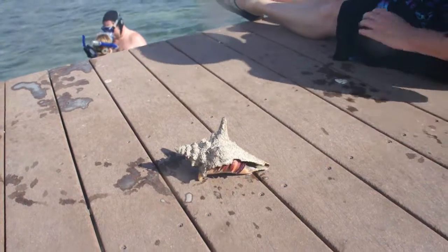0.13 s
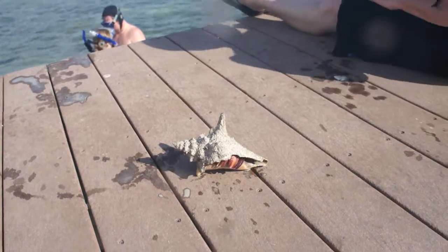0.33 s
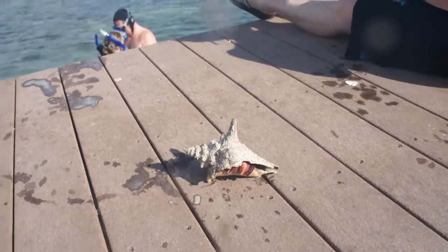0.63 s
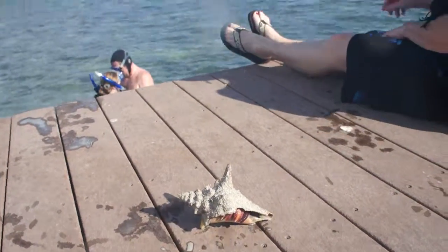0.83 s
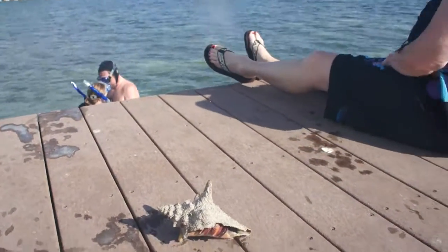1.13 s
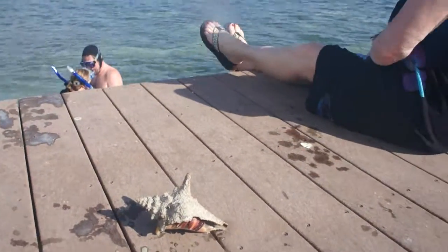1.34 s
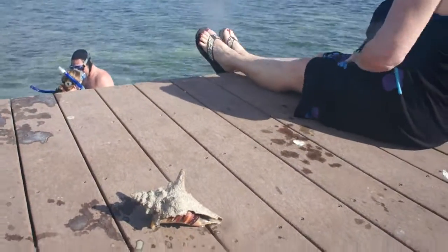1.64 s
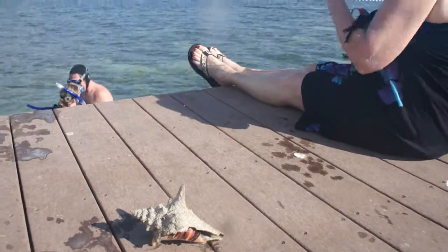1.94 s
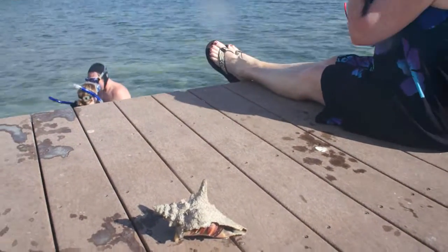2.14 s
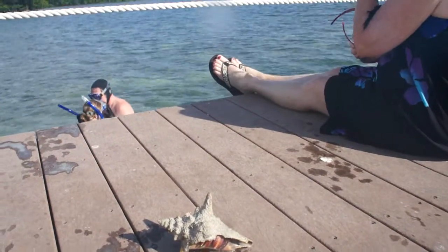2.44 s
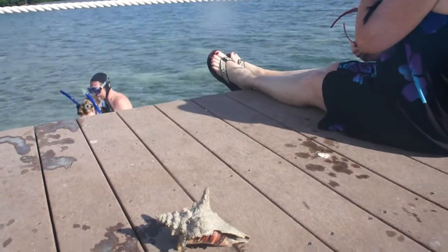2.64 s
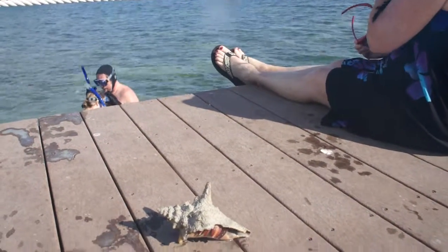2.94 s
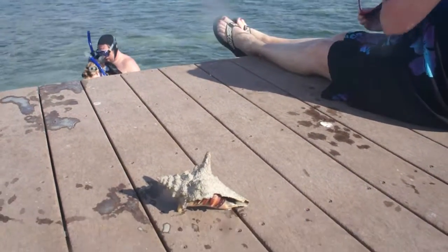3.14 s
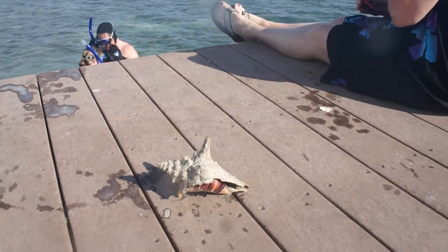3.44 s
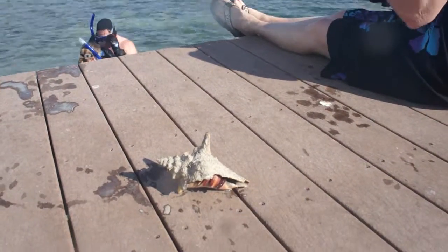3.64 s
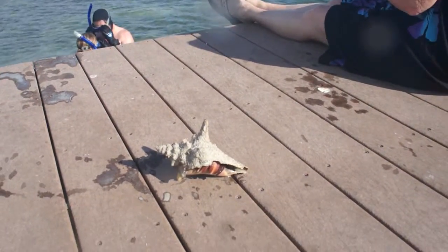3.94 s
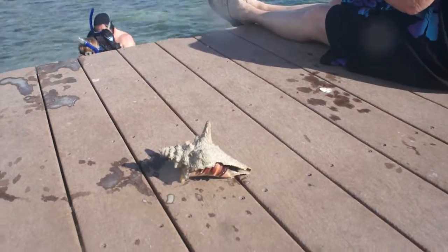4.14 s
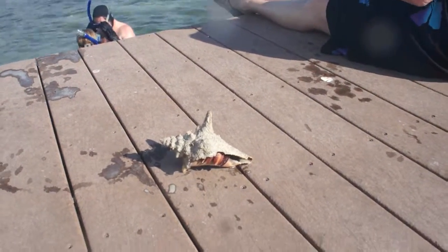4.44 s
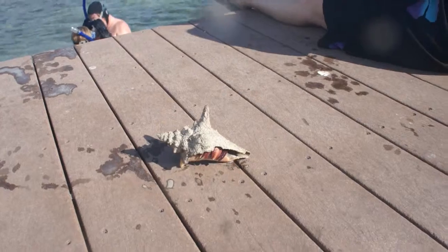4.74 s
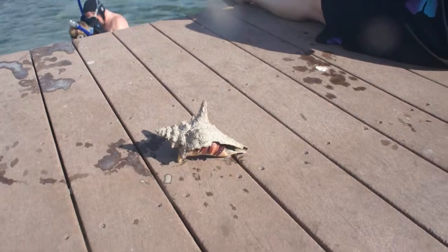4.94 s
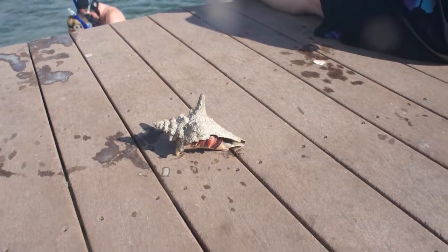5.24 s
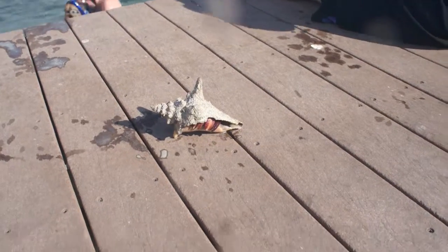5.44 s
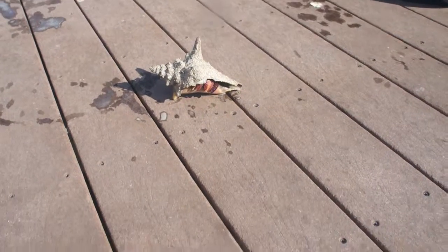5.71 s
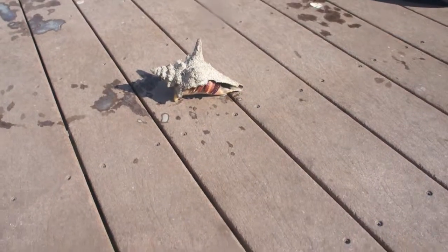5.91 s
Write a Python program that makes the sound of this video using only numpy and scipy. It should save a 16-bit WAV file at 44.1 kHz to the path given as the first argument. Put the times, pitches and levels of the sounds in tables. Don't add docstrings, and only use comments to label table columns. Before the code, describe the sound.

Stick-slip creaks of a gripping hand ring a hollow plastic shell, heard from inside by two microphones that catch it unevenly. Loud early clusters give way to small squeaks, then bright fingertip clicks with low palm thumps and short skin scrapes mid-way. A sparse, quieter stretch follows, then creaks and knocks return near the end. A faint boxy hum wavers under steady hiss, with no water sound.

```python
import sys
import numpy as np
from scipy import signal
from scipy.fft import rfft, irfft
from scipy.io import wavfile
from scipy.ndimage import uniform_filter1d, minimum_filter1d

SR = 44100
rng = np.random.default_rng(int(sys.argv[2]) if len(sys.argv) > 2 else 0)


def undo_db(level):
    steps = np.asarray(level, float) / 20
    return 10 ** steps


def transcribe(signal):
    frames = np.atleast_2d(signal).T
    limited = np.clip(frames, -1, 1)
    pcm = np.round(limited * 32767).astype(np.int16)
    wavfile.write(sys.argv[1], SR, pcm)


N = 267687

# start_s, energy_db, length_ms, low_mode_db
CREAKS = [(0.04, -60, 6.2, -16), (0.247, -65, 12, -2), (0.414, -53.5, 12, -14), (0.427, -40.5, 22, -7),
          (0.453, -34, 43, -8), (0.492, -49, 27, -15), (0.522, -57.5, 25, -6), (0.594, -58, 63, 2),
          (0.942, -58.5, 16.7, 0.5), (1.296, -52.5, 18, -2.5), (1.45, -44.5, 5.8, -8),
          (1.482, -36, 22.4, -2.5), (1.563, -33.5, 41, -11.5), (1.589, -32, 7.1, -12), (1.63, -55, 5.3, -6),
          (1.676, -51, 15.3, -7), (1.822, -55, 16, -12), (2.155, -55, 31, -1), (2.23, -52, 35.5, -5.5),
          (2.524, -53.5, 18, -1.5), (2.982, -49.5, 42, 4.5), (3.178, -52, 13.7, 4.5), (4.104, -57, 2.1, -2),
          (5.035, -37, 18, -6.5), (5.059, -42, 8.4, -4.5), (5.074, -54.5, 17, 5), (5.474, -48.5, 34, 0.5),
          (5.508, -46, 17.3, -12), (5.549, -50, 5.7, -27), (5.879, -48.5, 24, -2)]
# start_s, energy_db, length_ms, low_mode_db
KNOCKS = [(0.367, -57.5, 1.46, -11), (0.424, -38.5, 4.1, -25), (0.442, -26.5, 3.1, -21),
          (0.881, -49.5, 0.78, 7.5), (0.9165, -54.5, 1.5, 7.5), (1.113, -46, 6.1, -0.5),
          (1.457, -38, 10, -9), (1.471, -33.5, 6, -5), (1.732, -42.5, 5, -6.5), (1.934, -52, 16, -15),
          (1.942, -47, 4.2, -15), (1.951, -34, 9, -7.5), (1.966, -36, 8.2, -1), (2.03, -54.5, 3.9, -4),
          (2.126, -50, 6.8, -9), (2.258, -47.5, 9.6, -29), (2.532, -61, 5.5, 5), (2.543, -43.5, 5.3, -2.5),
          (2.551, -52, 15, -2.5), (4.387, -69.5, 9.8, -29), (1.672, -58, 5.3, -1), (2.948, -69, 11, 1),
          (2.843, -66, 1.1, 12.5), (3.06, -51, 1.7, 3.5), (3.271, -52.5, 8.9, 5.5), (3.783, -61.5, 4, -4),
          (4.302, -53, 0.4, -1), (4.933, -47.5, 2, -15), (5.022, -40.5, 13.7, -2), (5.156, -51, 5.2, -6),
          (5.494, -39.5, 8.4, -13), (5.537, -42.5, 9, -7.5), (5.717, -54, 7.2, -2.5),
          (5.906, -50.5, 8.8, -12), (6.011, -48.5, 2.9, -12.5)]
# start_s, energy_db, length_ms, low_mode_db, upper_modes_db
SNAPS = [(.439, -42, 2.5, 0.5, -2), (0.453, -32, 6, -6, -1.5), (.465, -33.5, 1.54, -3.5, 0.5),
         (.476, -35.5, 3.9, -2, -7), (.484, -38.5, 4.7, 1, -14), (.496, -49.5, 9.8, -2, 3),
         (0.93, -52, 20, -20, -10), (1.425, -54.5, 6.6, 1, -2), (1.44, -56.5, 8.5, 6, 7.5),
         (1.498, -40, 16, -20, -11), (1.553, -56, 7, 0, 3), (1.599, -33.5, 6.3, -17, -2),
         (1.611, -47.5, 7.4, 3, 5), (2.082, -62, 3.7, 2, -2), (2.104, -60, 3.5, -1.5, -4),
         (2.15, -59.5, 3.5, 0, 12.5), (2.162, -58, 12, -1, 9), (2.177, -60.5, 3.1, -9, 11.5),
         (2.287, -60.5, 6.3, -6, 6), (2.333, -58, 7.6, -5, 6), (2.356, -61.5, 2.1, -8, 11),
         (2.424, -69, 3.5, -4, 12), (2.467, -68, 4.8, -10, -3), (2.515, -55, 6.3, -15, -1),
         (4.211, -69.5, 9.2, -15, -1), (4.52, -57, 10.5, 0, 3), (4.547, -64, 12, -9, -3),
         (4.561, -60, 6.6, -18, -5), (4.581, -63.5, 4.9, 2.5, 4), (4.598, -62.5, 5.6, 1.5, 0),
         (4.607, -59, 3.1, 2, 5), (4.643, -61, 6.4, -13, -9), (4.653, -60.5, 4.9, -18, -8),
         (4.686, -61, 11, -7, 3), (4.725, -63.5, 4.1, -7, 0), (4.747, -63, 12, 2, 10),
         (5.048, -57, 2.9, 0, -3), (5.088, -51.5, 6.6, 0.5, -2), (5.46, -62, 11, -12, -8),
         (5.558, -55.5, 8.7, -5, -10)]
# start_s, length_s, energy_db, low_mode_db
FIDGETS = [(1.086, .034, -62.5, 4), (1.127, .04, -57, 2.5), (1.282, 0.019, -58.5, -9),
           (1.792, 0.034, -61, -21), (2.058, .035, -75, 1), (2.304, .02, -61, -4), (2.316, .06, -73, 5),
           (2.411, .008, -68, -20), (2.695, .03, -66.5, -5), (2.774, .01, -68, -18), (3.543, .01, -71, -5),
           (0.205, .01, -64, -10), (2.856, .06, -68.5, 1.5), (2.961, .03, -55.5, -14), (3.03, .035, -71, 4),
           (3.084, .085, -59.5, -1), (3.183, 0.031, -59, 5.5), (3.802, .015, -69, 3),
           (3.875, .01, -61.5, -17), (4.046, .03, -68, -21), (4.124, .01, -62, -18), (4.274, .025, -69, 1),
           (4.531, .13, -64.5, -6.5), (4.706, .13, -73.5, -1), (5.188, .025, -62, -7),
           (5.223, .03, -60.5, -3.5), (5.651, 0.066, -64, -5.5), (5.813, .06, -67.5, 1.5),
           (1.536, .03, -66.5, 7)]
# time_s, upper_modes_db
HAND_PLACE = [(0, -7), (.4, -3), (.64, 7), (1.1, -4), (1.45, -7.5), (1.6, -2), (1.75, -4), (2.1, -4),
              (2.16, -5.5), (2.43, 1.5), (2.54, -7), (2.95, 1.5), (4.3, -3.5), (4.52, -10), (4.8, -11),
              (4.93, 1.5), (5.02, -7), (6.07, -10.5)]
# start_s, peak_db, centre_hz, edge_modes_db, left_minus_right_db
TICKS = [(0.4454, -22, 5100, 9.5, -2), (0.639, -35.5, 3000, 13.5, -7), (0.8809, -28.5, 3640, 11, 5),
         (0.9173, -33, 2800, -0.5, 5), (2.8433, -29, 3750, -2, 7), (2.971, -41, 7000, 8, 5),
         (3.008, -25.5, 3500, -1.5, 6), (3.057, -43, 9500, -10, -2), (3.0644, -17, 4580, -15, 6),
         (3.0647, -14, 6160, -8, 5), (3.1816, -30.5, 3090, 6.5, -7), (3.878, -29, 6400, -6.5, 6.5),
         (4.046, -19, 10400, -5.5, -19), (4.0542, -23.5, 6950, -9, 6), (4.129, -23, 7340, -6.5, -1),
         (4.2565, -31, 3200, -4, 11), (4.267, -28, 3260, -21, -17), (4.279, -31, 3200, -15, -10),
         (4.287, -37, 4100, 10.5, 5), (4.3089, -21, 5750, -7.5, 2), (5.0594, -35, 3080, 4.5, 9),
         (5.619, -41, 3270, 1, -4), (3.0095, -38, 10000, -20, 2), (3.035, -35, 6500, -8, 0),
         (3.178, -42, 8500, -20, 0), (0.8806, -41, 6000, -20, 0), (3.082, -32, 6500, -20, 0),
         (3.094, -35, 6200, -20, 0)]
# start_s, peak_db, pitch_hz, shove_db
THUMPS = [(0.503, -43, 240, 7), (0.632, -27.5, 434, -1.5), (0.8779, -30.5, 282, 13.5),
          (0.9135, -32.5, 290, 13.5), (0.978, -32.5, 265, 4), (1.373, -42, 235, -28),
          (1.956, -42, 280, -36), (2.842, -29, 275, -1), (2.993, -48, 280, -8), (3.008, -23.5, 300, 0),
          (3.063, -20.5, 293, -0.5), (3.084, -25.5, 293, -5), (3.186, -35, 285, -1), (3.271, -37, 430, -9),
          (4.044, -34, 297, -2), (4.138, -32.5, 288, -4), (4.252, -41, 232, -11), (4.285, -47.5, 405, 17),
          (4.932, -41.5, 239, -5)]
# start_s, hold_s, grain_db, rumble_db
SCRAPES = [(0.412, 0.075, -56, -47.5), (0.513, 0.019, -47.5, -43.5), (0.583, 0.029, -50.5, -54),
           (0.628, 0.0084, -46, -53), (0.869, 0.005, -62, -44), (0.897, 0.013, -44, -41),
           (0.97, 0.025, -62, -44), (1.156, 0.11, -59, -65), (1.458, 0.062, -62, -54),
           (1.553, 0.015, -56, -51), (1.579, 0.033, -54, -44), (1.859, 0.059, -58.5, -56.5),
           (1.948, 0.024, -54.5, -51), (2.883, 0.065, -57, -69), (2.972, 0.045, -60, -46),
           (3.024, 0.006, -50, -40), (3.05, 0.016, -56, -42), (3.063, 0.0023, -34.5, -34.5),
           (3.08, 0.023, -46.5, -49), (3.138, 0.042, -50, -47.5), (3.19, 0.05, -48.5, -54),
           (4.039, 0.018, -51, -51), (4.089, 0.055, -59, -53), (4.259, 0.032, -53, -46.5)]
# time_s, level_db
TREMOR = [(0.0, -56), (0.64, -41.5), (1.59, -40.5), (2.03, -38), (2.15, -41), (2.82, -45), (3.09, -29),
          (3.26, -50), (3.5, -61), (4.45, -52.5), (4.65, -43.5), (4.87, -48.5), (5.07, -41.5), (5.78, -43),
          (6.07, -46.5)]

# pitch_hz, width_hz, left_db, right_db, right_lead_rad
LOW_MODE = [(623, 36, 0, -2.5, .2)]
MAIN_MODES = [(848, 150, -25, -19, 4.94), (912, 48, -45, -13.5, 1.35), (1026, 45, 0, -8.7, .41),
              (1055, 39, -5.2, -13.9, .79)]
UPPER_MODES = [(1285, 69, -12.1, -0.1, 4.53), (1365, 105, -12.5, -9.6, 5.62), (1482, 59, -45.0, 0.0, 3.14),
               (1641, 33, -11.4, -25.4, 1.68), (1723, 64, -4.4, -16.0, 3.02), (1784, 54, -7.4, -11.6, 4.18),
               (1817, 61, -20.5, -10.4, 0.14), (1843, 28, -15.3, -15.4, 2.18)]
EDGE_MODES = [(1948, 240, -30, -4, 2.44), (2138, 300, -30, -4.5, 3.63), (2516, 200, -6, 0, 2.97),
              (2700, 200, -7, -2, 4), (3050, 250, -12, -8, 4), (3375, 200, -10, -9, 3),
              (3874, 150, -12, -12, 3)]
HAND_MODES = [(223.6, 10.8, -32, 5.8, 2.6), (263.7, 29, -0.7, 1.3, 1.62)]
RUMBLE_MODES = [(145, 124, -52, 9.4, -3), (228.8, 13.5, -10, 11.6, 3.5), (266, 170, -11, 4.2, -0.96),
                (448, 220, -4.5, 7.1, -0.5)]
AIR_MODES = [(130, 16, -15, -15, .5), (207, 6, -8, -8, .5), (290, 14, -8, -8, .5), (419, 9, 2, 1, .3),
             (619, 7, 6, 5, .1)]

# pitch_hz, level_db (per Hz)
HISS_TONE = [(40, -49), (110, -32), (200, -1.5), (500, 0), (1000, -1.5), (2100, -10.5), (4000, -13.5),
             (9300, -19.5), (10300, -14), (11500, -25)]
# pitch_hz, level_db (per Hz)
SKIN_TONE = [(2500, -2), (3600, -4), (4800, -5), (5600, -4), (6300, 0), (7000, -2), (7900, -5),
             (11000, -11)]

SLIPS_PER_S, SLIP_SPREAD_DB = 2600, 2.5
CREAK_SWELL, KNOCK_SWELL, SNAP_SWELL = 0.8, 0.15, 0.55
LOW_LEAD_S = 0.0034
EDGE_DB, FIZZ_DB = -8, 37
EDGE_FULL_MS, EDGE_POWER = 46, 0.62
FIDGET_GAP_S, FIDGET_MS, FIDGET_SCATTER_DB = 0.018, 11.5, -0.5
TICK_FADE_S, TICK_BELOW_DB, TICK_ABOVE_DB = 0.0026, -10, -13
THUMP_LAG_S, THUMP_CYCLES, THUMP_LEAD_RAD = 0.003, 24.4, 0.7
SLIDE_ATTACK_S, SLIDE_RELEASE_S = 0.0044, 0.015
PORT_LAG, OWN_SHARE = 6, 0.6
HISS_DB, HUM_DB, HAND_DB, EDGE_HUM_DB, AIR_DB = -50.5, -10, 5, -62, -54.5
RUMBLE_DB, RUMBLE_SLOPE = -56, 0.7
DUCK_KNEE_DB, DUCK_RELEASE_S, DUCK_DEPTH = 4, 0.038, 0.042
MIC_LOW_HZ, TOP_HZ = 152, 11000
LIMIT, LIMIT_S = 0.97, 0.0008


def grip():
    low, main, upper, edge = np.zeros((4, N + 4096))
    t = np.arange(4096) / SR
    rows = [(*row, 0, CREAK_SWELL) for row in CREAKS]
    rows += [(*row, 0, KNOCK_SWELL) for row in list(KNOCKS) + fidgets()]
    rows += [(*row, SNAP_SWELL) for row in SNAPS]
    for s, db, ms, low_db, own_db, swell in rows:
        upper_db = np.interp(s, *np.transpose(HAND_PLACE)) + own_db
        when, size, way = rng.random((3, 4096))
        jerks = ((when < SLIPS_PER_S / SR) | (t == 0)) * np.sign(way - 0.5)
        jerks = jerks * undo_db(-SLIP_SPREAD_DB * np.log(size)) * np.exp(-(1000 * t / ms) ** 3)
        jerks = jerks * (1 - swell * np.exp(-1000 * t / (4.5 * ms)))
        span = slice(int(s * SR), int(s * SR) + 4096)
        power = np.abs(rfft(jerks)) ** 2
        floor = 0.35 * power[40:180].mean()
        for force, share_db, bins in (
                (low, low_db, power[53:63]),
                (main, 0, power[92:101]),
                (upper, upper_db, power[115:170])):
            force[span] += jerks / np.sqrt(max(bins.mean(), floor)) * undo_db(db + share_db)
        reach = min(ms / EDGE_FULL_MS, 1) ** EDGE_POWER
        edge[span] += jerks / np.sqrt(power[200:400].mean()) * undo_db(db + upper_db) * reach
    body = casing(np.roll(low, -int(LOW_LEAD_S * SR)), LOW_MODE, 565, 715)
    body += casing(main, MAIN_MODES, 815, 1330)
    body += casing(upper, UPPER_MODES, 1012, 1950)
    body += undo_db(EDGE_DB) * casing(edge, EDGE_MODES, 1620, 3970)
    rubbing = uniform_filter1d(np.abs(edge), size=300)
    fizz = band(rng.standard_normal((2, len(edge))) * rubbing, 1300, 7700)
    return (body + undo_db(FIZZ_DB) * fizz)[:, :N]


def fidgets():
    rows = []
    for s, length, db, low_db in FIDGETS:
        gap, size, ms, way = rng.random((4, 12))
        after = FIDGET_GAP_S * (np.cumsum(0.5 + gap) - 0.5 - gap[0])
        size_db = db + FIDGET_SCATTER_DB * 2 * (2 * size - 1)
        length_ms = FIDGET_MS * 2 ** (2 * ms - 1)
        mode_db = low_db + 5 * (2 * way - 1)
        creaks = np.transpose([s + after, size_db, length_ms, mode_db])
        rows += list(creaks[after < length])
    return rows


def ticks():
    rows = np.array(TICKS)
    out = np.zeros((2, N + 512))
    t = np.arange(512) / SR
    for s, db, hz, _, pan_db in rows:
        chance = rng.standard_normal((3, 512))
        crackle = ports(chance[0], chance[1:]) * np.exp(-t / TICK_FADE_S)
        crackle = colour(crackle, [(hz / 4, -30), (hz / 1.6, TICK_BELOW_DB), (hz, 0),
                                   (hz * 1.4, TICK_ABOVE_DB), (hz * 3, -18)])
        sides_db = db + np.array([[0.5], [-0.5]]) * np.clip(pan_db, -5, 5)
        at = int(s * SR)
        out[:, at:at + 512] += crackle / np.abs(crackle).max() * undo_db(sides_db)
    flicks = np.zeros(N)
    np.add.at(flicks, (rows[:, 0] * SR).astype(int), undo_db(rows[:, 1] + rows[:, 3] - 28))
    return out[:, :N] + casing(flicks, EDGE_MODES, 590, 7200)


def thumps():
    out = np.zeros((2, N + 8192))
    t = np.arange(8192) / SR
    shove = np.sin(2 * np.pi * t / 0.002) * np.exp(-t / 0.00067) * 3.1
    for s, db, hz, shove_db in THUMPS:
        shape = undo_db(-60 * t * hz / THUMP_CYCLES) * (1 - np.exp(-t / 0.0016))
        mode = shape * np.sin(2 * np.pi * hz * t + np.array([[0], [THUMP_LEAD_RAD]]))
        at = int((s + THUMP_LAG_S) * SR)
        out[:, at:at + 8192] += undo_db(db) * (mode + undo_db(shove_db) * shove)
    return band(out[:, :N], 94, 7000)


def scrapes():
    skin = ports(slips(6000, 2), np.array([slips(6000, 2), slips(6000, 2)])) * undo_db(3 * walk(60))
    rumble = band(ring(slips(300, 2.62), RUMBLE_MODES), 172, 2700)
    grain_gain, rumble_gain = slides()
    return level(colour(skin, SKIN_TONE), 1.2) * grain_gain + level(rumble, 3) * rumble_gain


def slides():
    t = np.arange(N) / SR
    out = np.zeros((2, N))
    for s, hold, grain_db, rumble_db in SCRAPES:
        attack = np.clip((t - s) / SLIDE_ATTACK_S, -40, 0)
        release = np.clip((s + hold - t) / SLIDE_RELEASE_S, -40, 0)
        out += np.outer(undo_db([grain_db, rumble_db]), np.exp(attack + release))
    return out


def casing(force, modes, lo_hz, hi_hz):
    jerk = ring(band(np.eye(1, 8192)[0], lo_hz, hi_hz), modes)
    return ring(band(force, lo_hz, hi_hz), modes) / np.sqrt(np.sum(jerk ** 2) / 2 / SR)


def ring(force, modes):
    out = np.zeros((2, len(force)))
    for hz, width, left_db, right_db, lead in modes:
        pole = np.exp((2j * hz - width) * np.pi / SR)
        z = width * signal.lfilter([1], [1, -pole], force)
        out += [undo_db(left_db) * z.imag, undo_db(right_db) * (z * np.exp(1j * lead)).imag]
    return out


def slips(rate, spread_db):
    jerks = (rng.random(N) < rate / SR) * rng.choice([-1, 1], N)
    size_db = spread_db * np.minimum(rng.exponential(size=N), 5.5)
    return level(jerks * undo_db(size_db), 0)


def ports(shared, own):
    return np.array([np.roll(shared, PORT_LAG), shared]) + OWN_SHARE * own


def walk(rate):
    k = int(SR / rate)
    held = np.repeat(rng.standard_normal(N // k + 1), k)
    return uniform_filter1d(uniform_filter1d(held, k), k)[:N]


def level(x, db):
    return x * undo_db(db) / np.sqrt(np.mean(x ** 2))


def colour(x, tone):
    hz = np.maximum(np.fft.rfftfreq(x.shape[-1], 1 / SR), 1)
    tone_hz, tone_db = np.transpose(tone)
    return irfft(rfft(x) * undo_db(np.interp(np.log(hz), np.log(tone_hz), tone_db)), x.shape[-1])


def band(x, lo_hz, hi_hz):
    return signal.sosfilt(signal.butter(3, [lo_hz, hi_hz], "band", fs=SR, output="sos"), x)


def background():
    hiss = level(colour(rng.standard_normal((2, N)), HISS_TONE), HISS_DB)
    air = slips(3000, 3.56) * undo_db(3.5 * walk(14))
    hum = casing(air, LOW_MODE, 380, 1700)
    hum += undo_db(8) * casing(air, MAIN_MODES, 460, 1480)
    hum += undo_db(2.5) * casing(air, UPPER_MODES, 530, 2600)
    hum = level(hum, HUM_DB)
    hand = level(ring(rng.standard_normal(N) * undo_db(2 * walk(19)), HAND_MODES), HAND_DB)
    edge = level(casing(air, EDGE_MODES, 1900, 4500), EDGE_HUM_DB)
    drone = level(ring(rng.standard_normal(N), AIR_MODES), AIR_DB)
    tremor_db = np.interp(np.arange(N) / SR, *np.transpose(TREMOR))
    hand_gain = undo_db(RUMBLE_DB + RUMBLE_SLOPE * (tremor_db + 44))
    return hiss + drone + edge + hum * undo_db(tremor_db) + hand * hand_gain


def scene():
    near = grip() + ticks() + thumps() + scrapes()
    keep = np.exp(-1 / (DUCK_RELEASE_S * SR))
    power = signal.lfilter([1 - keep], [1, -keep], np.mean(near ** 2, axis=0))
    duck = (1 + power / undo_db(2 * DUCK_KNEE_DB)) ** -DUCK_DEPTH
    return near + background() * duck


def low_pass(x):
    return signal.sosfilt(signal.butter(12, 12110, fs=SR, output="sos"), x)


def record(dry):
    bass_cut = signal.sosfilt(signal.butter(2, MIC_LOW_HZ, "high", fs=SR, output="sos"), dry)
    mix = signal.sosfilt(signal.ellip(8, 0.3, 32, TOP_HZ, fs=SR, output="sos"), bass_cut)
    reach = int(LIMIT_S * SR)
    room = np.minimum(1, LIMIT / (np.abs(mix).max(axis=0) + 1e-9))
    room = minimum_filter1d(room, 2 * reach)
    limited = mix * uniform_filter1d(uniform_filter1d(room, reach), reach)
    return low_pass(limited)


dry = scene()
out = record(dry)
transcribe(out)
```